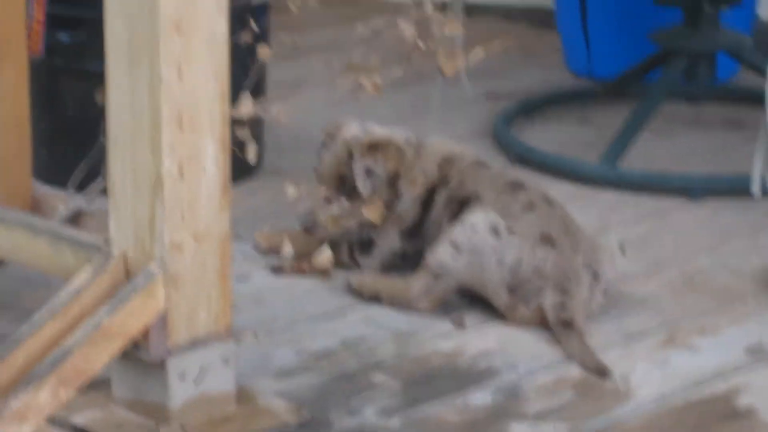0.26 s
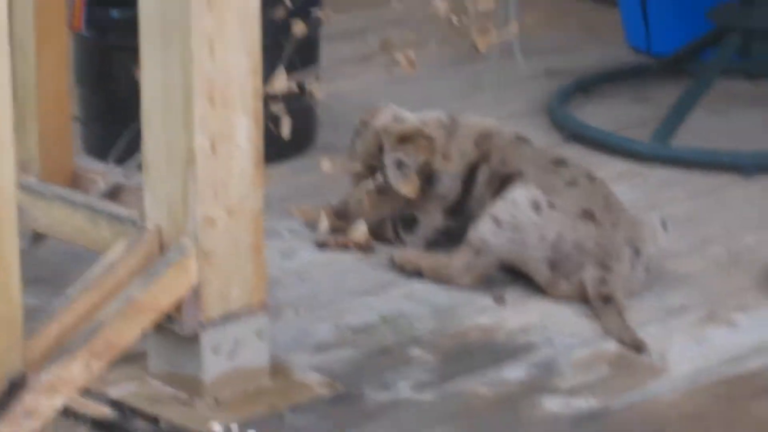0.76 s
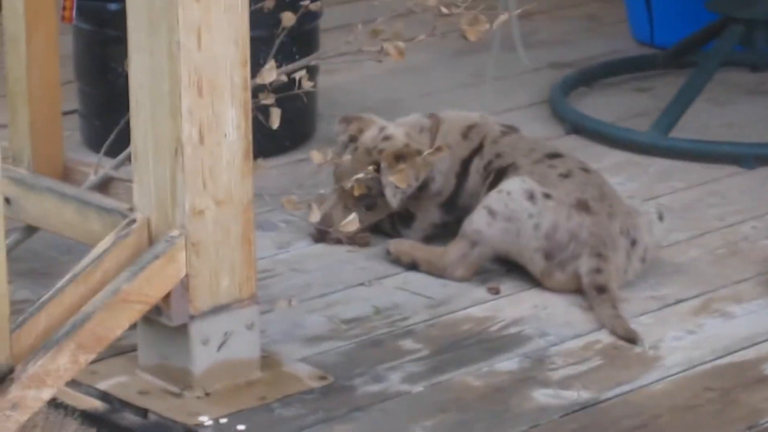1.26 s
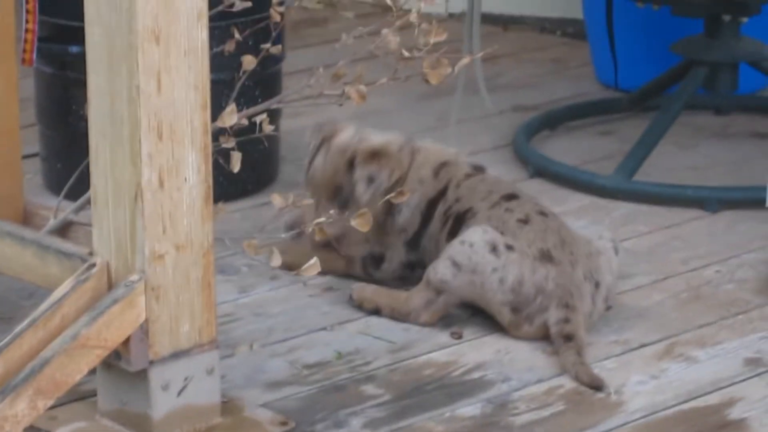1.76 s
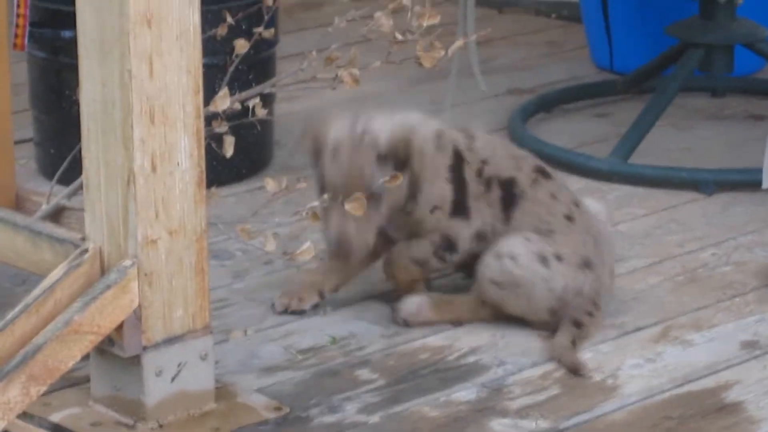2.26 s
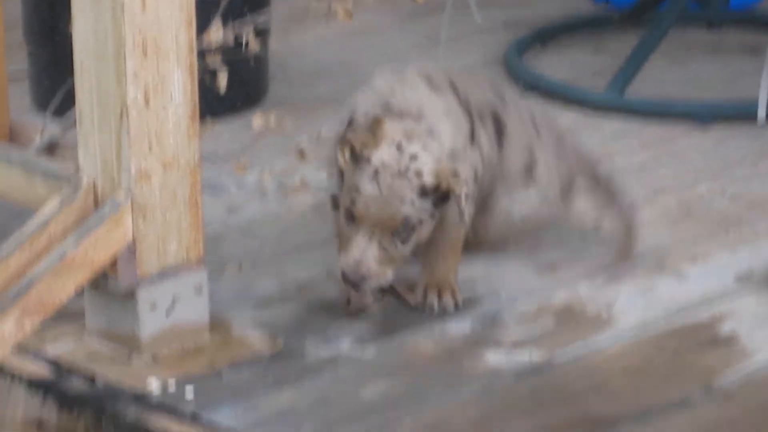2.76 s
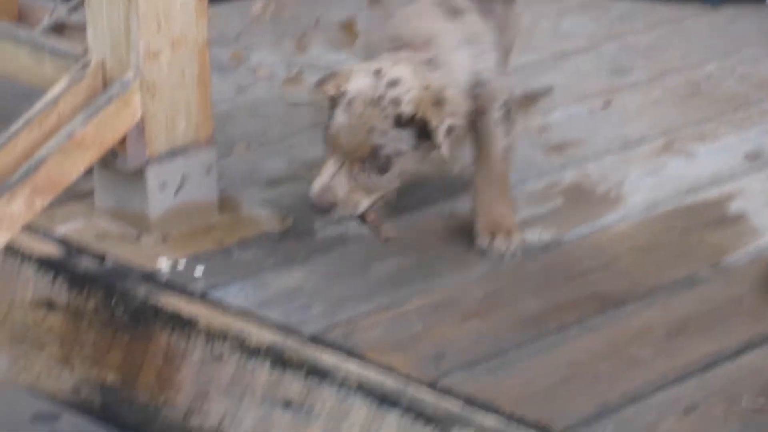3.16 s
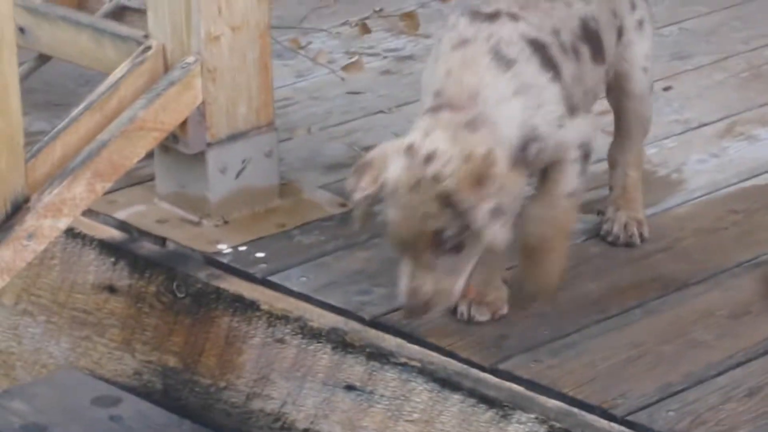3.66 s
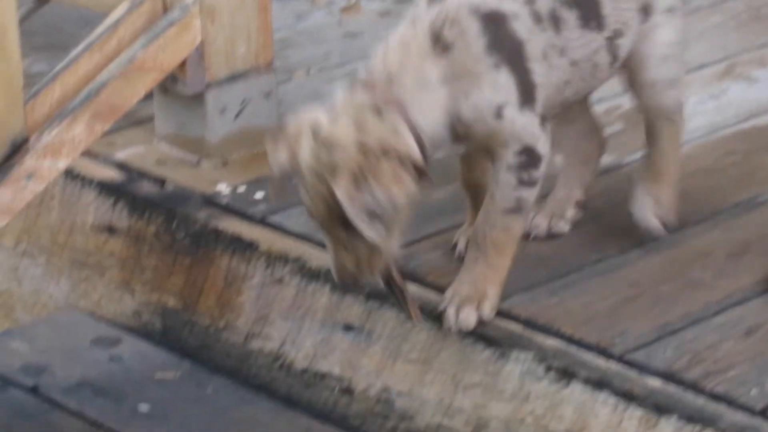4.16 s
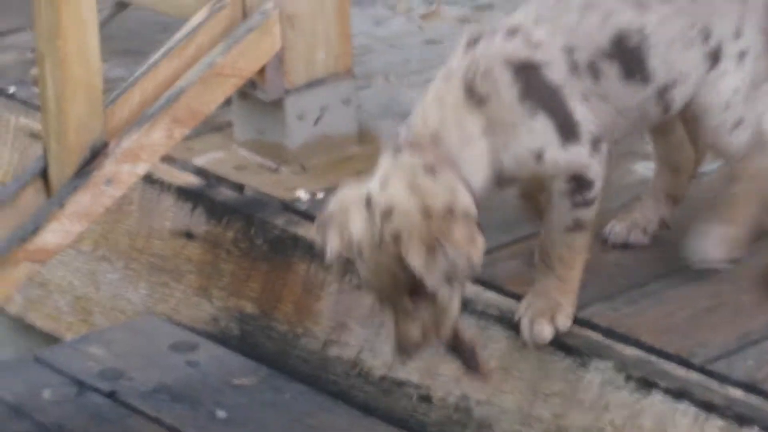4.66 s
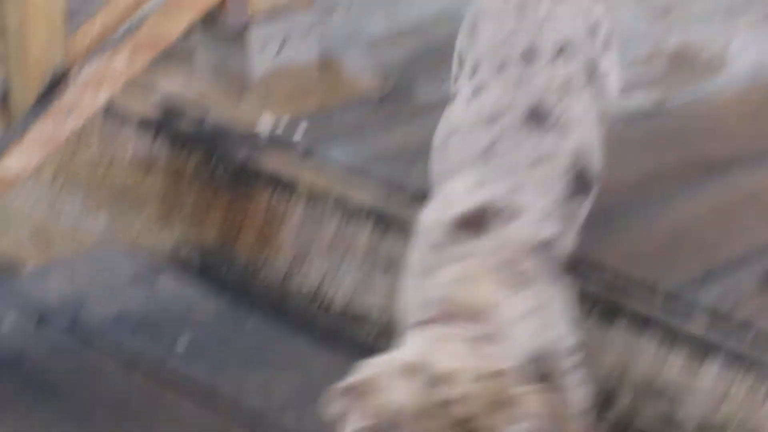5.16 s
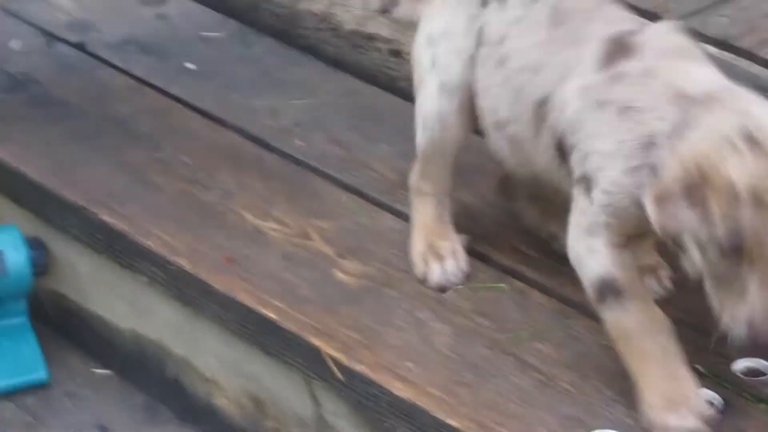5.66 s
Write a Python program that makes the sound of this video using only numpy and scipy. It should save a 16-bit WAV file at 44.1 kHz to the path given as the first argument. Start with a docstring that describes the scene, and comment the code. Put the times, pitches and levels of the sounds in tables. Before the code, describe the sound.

High bird chirps and twitters outdoors, a sharp click on the camera body, and a puppy's light paw thuds on a wooden deck.

```python
"""A wooden deck beside a house, heard from a hand-held camera. Small birds chip, buzz, twitter and scold
close by, their gliding whistles echoed by the boards, railings and walls. A puppy pads and scuffs about,
thudding on the boards and rubbing over the grain. Right at the microphone the camera's plastic shell
clicks once loudly and a few times softly. Far traffic and an airy hiss lie under it all."""
import sys
import numpy as np
from scipy import signal
from scipy.fft import rfft, irfft, next_fast_len
from scipy.io import wavfile
from scipy.ndimage import map_coordinates

SR = 44100
rng = np.random.default_rng(int(sys.argv[2]) if len(sys.argv) > 2 else 0)


def log_audio(samples):
    """Write samples as a 16-bit WAV file to the path given in sys.argv[1]."""
    # one column per channel
    frames = np.atleast_2d(samples).T
    # limit to full scale, then quantise
    limited = np.clip(frames, -1, 1)
    pcm = np.round(limited * 32767).astype(np.int16)
    wavfile.write(sys.argv[1], SR, pcm)


N = 260190
T = np.arange(N) / SR

# Sharp chips from perches around the deck; hidden birds reach the microphone mostly as echo.
# Each row: start in seconds, level in dB, starting pitch in Hz, echo against the direct call in dB.
BIRD_CHIPS = [(.582, -42, 8500, 7), (0.688, -47, 8600, 5), (1.149, -34.5, 8670, -3),
              (1.4125, -39.5, 8360, -3), (1.581, -43.5, 8560, 5), (1.6885, -41, 8250, 13),
              (1.8225, -34.5, 9240, 6), (2.009, -25.5, 9300, -8.5), (2.093, -37.5, 6330, -7),
              (2.148, -35, 7850, 5), (2.182, -32.5, 5780, -3), (2.355, -29.5, 8720, 7),
              (2.8672, -25, 9380, 1.5), (2.9868, -27, 9050, -3.5), (3.125, -30, 8730, 3.5),
              (3.2387, -31.5, 8570, 4), (3.2768, -40.5, 8000, 6), (3.6604, -31.5, 8500, 5),
              (3.6962, -29.5, 8650, -1), (3.809, -26.5, 8530, 5), (3.922, -39.5, 8800, 5),
              (4.212, -36, 8650, 4), (4.226, -35, 8760, 16), (4.346, -32, 8280, 1), (4.411, -47, 5160, 3),
              (4.644, -41, 8570, 4), (4.8278, -33.5, 8250, 1), (5.2271, -28.5, 8180, -3.5),
              (5.4303, -35.5, 8250, 5), (5.4519, -36, 8450, 0), (5.5673, -32, 8200, 0.5),
              (5.712, -36, 8400, -1), (5.8488, -38, 8650, 4)]

def chips():
    """Contact chips, each with the echo of its own perch."""
    out = np.zeros(N)
    for start, db, top_hz, echo_db in BIRD_CHIPS:
        add(out, start, amp(db) * yard(chip(top_hz), echo_db, wall_db=-15))
    return out

def chip(top_hz, usual_hz=8160, landing_hz=2101, rasp_db=4.0):
    """A raspy whistle that plunges about two octaves in milliseconds and fades as it levels out."""
    # Starting away from the usual pitch, it falls for longer and loses low end.
    octaves_off = abs(np.log2(top_hz / usual_hz))
    fall_s = 0.0047 + 0.0125 * octaves_off
    low_end_db = max(-1.4 - 41 * octaves_off, -11)
    end_hz = landing_hz * np.exp(0.069 * rng.standard_normal())
    age = ticks(3 * fall_s) / fall_s
    height = np.exp(-age ** 1.69)
    pitch = end_hz + (top_hz - end_hz) * height
    level_db = np.interp(age, [0, 0.22, 0.8, 1.4, 2.2, 3], [-14.5, 0.5, 0.5, -5, -8, -10.5])
    level_db += low_end_db * (1 - height)
    level_db += rasp_db * wobble(1137, len(age))
    return amp(level_db) * voice(pitch, [-1.5, -6.5, -16, -17], rough=0.028)

def buzz(start=1.96, length=0.135, flutter_hz=107.5):
    """One close whistle fluttering between two sagging pitches, the upper sinking to meet the lower."""
    low_hz, high_hz, sag_hz_per_s = 6640, 9440, 6100
    attack_s, swell_db, fade_db_per_s, release_s = 0.028, 12, 68, 0.0073
    out, t = np.zeros(N), ticks(length)
    span_hz = (high_hz - low_hz) * (1 - (t / length) ** 5)
    pitch = low_hz - sag_hz_per_s * t + span_hz * np.cos(np.pi * flutter_hz * t) ** 2
    level_db = -28.5 + np.minimum(swell_db * (t / attack_s - 1), -fade_db_per_s * (t - attack_s))
    release = np.minimum((length - t) / release_s, 1)
    call = amp(level_db) * release * voice(pitch, [0])
    add(out, start, yard(call, echo_db=-4, t60=0.18))
    return out

# Twitters near the deck. Each row: start in seconds, level of the first note in dB, number of notes.
BIRD_TWITTERS = [(3.766, -38.5, 3), (4.294, -36.5, 4)]

def twitter(note_s=0.0124, every_s=0.0135, growth_db=1.3):
    """Strings of arched notes, each louder and swooping up from lower down than the one before."""
    out, progress = np.zeros(N), ticks(note_s) / note_s
    for start, db, count in BIRD_TWITTERS:
        for k in range(round(count)):
            start_hz, crest_hz = 5900 * 0.76 ** k, 6600 - 100 * k
            pitch = crest_hz - (crest_hz - start_hz) * (1 - progress / 0.67) ** 2
            call = np.sin(np.pi * progress) ** 0.58 * voice(pitch, [1, -9])
            add(out, start + k * every_s, amp(db + growth_db * k) * yard(call, echo_db=-5))
    return out

# A quick run of high scolds, doubled by the house wall. Each row: start in seconds, starting pitch in Hz.
HIGH_SCOLDS = [(4.023, 3100), (4.105, 3245), (4.426, 3485), (4.503, 3480), (4.580, 3320), (4.661, 3310),
               (4.745, 3190), (4.835, 3130)]
# Hoarse nasal notes from farther off. Each row: start in seconds, level in dB, starting pitch in Hz.
NASAL_NOTES = [(.201, -51.5, 2224), (0.233, -50.5, 1975), (.301, -49.5, 2227), (.331, -51.5, 1950),
               (.514, -52.5, 2200), (.698, -52.5, 2050), (1.078, -52, 2126), (1.117, -52.5, 2190),
               (1.192, -58, 2110), (1.286, -54.5, 2055), (1.449, -46, 2130), (3.183, -51, 2065),
               (3.322, -55.5, 2080), (3.535, -53.5, 2183)]
# Thin gliding whistles, faint at the microphone. Each row: start in seconds, level in dB,
# length in seconds, starting pitch in Hz, fraction of the pitch lost by the end.
THIN_WHISTLES = [(0.756, -60, .09, 7250, 0.09), (3.645, -46.5, 0.054, 5450, 0.3)]

def scolding():
    """Drooping scolds, nasal notes and whistles, all through an open beak that favours 6 to 9 kHz."""
    out = np.zeros(N)
    for start, pitch_hz in HIGH_SCOLDS:
        call = note(pitch_hz, droop=0.52, length=0.02, overtones_db=[2, -0.5, 2, -2], rough=0.012)
        add(out, start, amp(-45.5) * yard(call, echo_db=-0.5, wall_db=-2.5, deck_db=-20))
    for start, db, pitch_hz in NASAL_NOTES:
        call = note(pitch_hz, droop=0.228, length=0.028, overtones_db=[0.5, 0, -2, -7.5], rough=0.04)
        add(out, start, amp(db) * yard(call, echo_db=-2.5, deck_db=-22, wall_db=-17, t60=0.18))
    for start, db, length, pitch_hz, droop in THIN_WHISTLES:
        call = note(pitch_hz, droop, length, overtones_db=[0, -7], rough=0.011)
        add(out, start, amp(db) * yard(call, echo_db=-4))
    return coloured(out, [(2000, 1.5), (4500, 0), (6500, 5), (8500, 2.5), (10500, -5.5)])

def note(pitch_hz, droop, length, overtones_db, rough):
    """A reedy note whose pitch sags faster and faster."""
    progress = ticks(length) / length
    pitch = pitch_hz * (1 - droop * (progress + 2 * progress ** 3) / 3)
    return np.sin(np.pi * progress) ** 0.75 * voice(pitch, overtones_db, rough)

def voice(pitch, overtones_db, rough=0.013):
    """A bird's tone on a slightly trembling pitch; overtones beyond hearing are dropped."""
    tremble = 1 + rough * wobble(893, len(pitch))
    phase = 2 * np.pi * np.cumsum(pitch * tremble) / SR
    return sum(amp(db) * np.sin(k * phase) * (k * pitch < SR / 2) for k, db in enumerate(overtones_db, 1))

def yard(call, echo_db, t60=0.21, deck_db=-1, wall_db=-6, wall_s=0.02):
    """A call with its bounces off deck and wall and the scatter from railings, new for each perch."""
    t = ticks(0.3)
    build_up = 1 - np.exp(-(t / 0.0022) ** 2)
    scatter = rng.standard_normal(len(t)) * amp(-60 * t / t60) * build_up
    path = scatter / np.linalg.norm(scatter)
    deck_delays = (rng.uniform(0.003, 0.012, size=5) * SR).astype(int)
    path[deck_delays] += amp(deck_db) / np.sqrt(5)
    path[int(wall_s * SR)] += amp(wall_db)
    path *= amp(echo_db)
    path[0] = 1  # the direct sound
    return signal.fftconvolve(call, path / np.linalg.norm(path))

# Contacts on the camera body, right at the microphone.
# Each row: start in seconds, peak level in dB, brightness in Hz.
SHELL_CLICKS = [(2.3788, -31, 1000), (2.3968, -18.5, 2200), (2.4086, -21, 1900), (2.4118, -0.5, 11900),
                (2.4188, -13, 2040), (5.879, -26.5, 4500)]
# Modes of the plastic shell. Each row: frequency in Hz, width in Hz, level in dB.
SHELL_MODES = [(300, 550, -31), (700, 72, -19), (1023, 62, -3), (1745, 107, 0.5), (2150, 193, -5),
               (2930, 260, -7.5), (4000, 100, -16.5), (4400, 220, -7.5), (4895, 380, -8.5),
               (6200, 330, -18.5), (7750, 780, -23), (9460, 600, -25.5)]

def camera():
    """Each contact rings the plastic shell with a short, dry click."""
    out = np.zeros(N)
    for start, db, bright_hz in SHELL_CLICKS:
        add(out, start, amp(db) * struck(SHELL_MODES, bright_hz))
    return out

# Modes of the deck boards. Each row: frequency in Hz, width in Hz, level in dB.
BOARD_MODES = [(112, 88, -4), (197, 70, -5), (337, 65, -3.5), (577, 140, -17)]
# Soft paw falls on the deck. Each row: start in seconds, peak level in dB.
PAW_FALLS = [(2.299, -50), (2.336, -51), (5.052, -41), (5.158, -43), (5.306, -37), (5.663, -53),
             (5.717, -39)]
# The puppy shifts its weight. Each row: start in seconds, length in seconds, level in dB, brightness in Hz.
WEIGHT_SHIFTS = [(2.26, 0.13, -50, 140), (2.53, 0.1, -58, 200), (5.03, .17, -56, 350),
                 (5.65, 0.077, -51, 350)]
# Claws tapping the wood. Each row: start in seconds, peak level in dB.
CLAW_TAPS = [(3.077, -48), (5.035, -44), (5.151, -38), (5.1704, -40)]
# The tone of one tap. Each row: frequency in Hz, level in dB.
CLAW_SPECTRUM = [(300, -32), (900, -17), (1800, 4), (4000, -3), (7000, -19), (11000, -31)]
# Paws and dry twigs dragged over the deck.
# Each row: start in seconds, length in seconds, level in dB, centre pitch in Hz.
DECK_SCUFFS = [(.07, 0.24, -48.5, 1000), (2.24, 0.18, -48.5, 610), (4.77, 0.11, -55, 1030),
               (4.948, 0.029, -47.5, 1100), (5.029, .036, -45.5, 800), (5.10, 0.2, -55.5, 1390),
               (5.51, 0.024, -50, 1400), (5.65, 0.026, -46, 1500), (5.684, 0.033, -49, 1810),
               (5.68, .13, -53, 550), (5.77, 0.073, -50, 1730), (5.825, 0.098, -50, 1470)]

def puppy(claw_t60=0.076, scuff_width_hz=680):
    """Pads thud on the boards, its weight makes them rumble, claws tick, and paws drag over the grain."""
    out, t = np.zeros(N), ticks(0.05)
    for start, db in PAW_FALLS:
        add(out, start, amp(db) * struck(BOARD_MODES, bright_hz=900))
    for start, length, db, bright_hz in WEIGHT_SHIFTS:
        add(out, start, amp(db) * rubbed(length, body(BOARD_MODES, bright_hz)))
    for start, db in CLAW_TAPS:
        tap = coloured(rng.standard_normal(len(t)), CLAW_SPECTRUM) * amp(-60 * t / claw_t60)
        add(out, start, amp(db) * tap / np.abs(tap).max())
    for start, length, db, pitch_hz in DECK_SCUFFS:
        grain = body([(pitch_hz, scuff_width_hz, 0)], bright_hz=9000)
        add(out, start, amp(db) * rubbed(length, grain))
    return out

def struck(modes, bright_hz):
    """A body's ring after one blow, peak 1."""
    ring = filtered(signal.unit_impulse(SR // 8), body(modes, bright_hz))
    return ring / np.abs(ring).max()

def rubbed(length, response, catches_per_s=2500):
    """A swelling and fading run of tiny catches through a resonance."""
    n = int(length * SR)
    catches = rng.standard_normal(n) * (rng.random(n) < catches_per_s / SR)
    return unit(filtered(catches, response)) * np.hanning(n)

def body(modes, bright_hz):
    """The response of modes of alternating sign; a soft contact leaves the high ones still."""
    def response(hz):
        ring = sum((-1) ** k * amp(db) * 1j * hz * width / (centre ** 2 - hz ** 2 + 1j * hz * width)
                   for k, (centre, width, db) in enumerate(modes))
        return ring / (1 + 1j * hz / bright_hz) ** 3
    return response

# One engine far from the house, easing off and picking up.
# Each row: time in seconds, pitch in Hz, level in dB.
FAR_ENGINE = [(1.8, 175, -79), (2.1, 181, -64), (2.56, 202, -59), (3.05, 175, -63.5), (3.8, 176, -61.5),
              (4.4, 176, -81), (4.85, 182, -60), (5.2, 199, -60), (5.6, 204, -71)]

def engine():
    """The faint wavering drone of a far vehicle."""
    pitch, level_db = curves(FAR_ENGINE)
    waver = 1 + 0.0118 * wobble(14, N)
    phase = 2 * np.pi * np.cumsum(pitch * waver) / SR
    return amp(level_db + 2.6 * wobble(9, N)) * np.sin(phase)

# Far traffic as it reaches the deck. Each row: time in seconds, level in dB.
TRAFFIC_LEVEL = [(0, -57.5), (1.02, -57), (2.07, -56.5), (2.25, -54), (2.9, -56), (3.8, -55), (4.6, -57.5),
                 (5.09, -52.5), (5.9, -55.3)]
# The tone of the traffic at that distance. Each row: frequency in Hz, level in dB.
TRAFFIC_SPECTRUM = [(12, -38), (20, -6), (48, -2.5), (70, -3), (97, 0.5), (162, -2.5), (241, 0),
                    (316, -1.5), (344, 0), (386, -4), (458, -8.5), (600, -12), (780, -25), (1320, -120)]

def traffic():
    """Distant traffic merges into a low, slowly swelling rumble."""
    level_db, = curves(TRAFFIC_LEVEL)
    return amp(level_db + 0.79 * wobble(5, N)) * unit(coloured(rng.standard_normal(N), TRAFFIC_SPECTRUM))

# The open air around the microphone. Each row: frequency in Hz, level in dB.
AIR_SPECTRUM = [(260, -15), (450, -2.5), (1150, -3), (1590, -7), (2690, -9), (3120, -9.5), (3380, -10.5),
                (4890, -12), (6550, -13), (7580, -13.5), (10700, -18.5), (13900, -48), (22000, -120)]

def air(level_db=-52):
    """A broad, almost even hiss."""
    return amp(level_db + 0.24 * wobble(2.97, N)) * unit(coloured(rng.standard_normal(N), AIR_SPECTRUM))

def amp(db):
    """Decibels to gain."""
    return 10 ** (np.asarray(db) / 20)

def unit(x):
    """Scale to rms 1."""
    return x / np.sqrt(np.mean(x ** 2) + 1e-20)

def ticks(seconds):
    """A time axis in seconds."""
    return np.arange(int(seconds * SR)) / SR

def curves(rows):
    """One value per sample for each column after the time."""
    times, *columns = np.transpose(rows)
    return [np.interp(T, times, column) for column in columns]

def wobble(rate, size):
    """A smooth random curve with rate knots a second."""
    knots = rng.standard_normal(int(size * rate / SR) + 4)
    return map_coordinates(knots, [np.arange(size) * rate / SR])

def filtered(x, response):
    """x through a complex response of frequency."""
    n = x.shape[-1]
    padded = next_fast_len(n + 8192)
    return irfft(rfft(x, padded) * response(np.fft.rfftfreq(padded, 1 / SR)), padded)[..., :n]

def coloured(x, points):
    """x through a smooth (Hz, dB) spectrum."""
    points_hz, db = np.transpose(points)
    return filtered(x, lambda hz: amp(np.interp(np.log(hz + 1), np.log(points_hz), db)))

def add(track, start, sound):
    """Mix a sound into the track at start seconds."""
    part = track[max(round(start * SR), 0):][:len(sound)]
    part += sound[:len(part)]

def scene():
    """Nearly mono; only the shell's clicks lean a little to the right."""
    outdoors = chips() + scolding() + buzz() + twitter() + puppy() + engine() + traffic() + air()
    return outdoors + camera() * amp([[-0.5], [0.5]])

def record(dry, ceiling=0.96, top_hz=10700):
    """The microphone dulls the very top; the camera rounds off the loudest peak and limits the band."""
    heard = coloured(dry, [(9300, 0.15), (10700, -3.4)])
    rounded = heard / (1 + np.abs(heard / ceiling) ** 12) ** (1 / 12)
    return filtered(rounded, lambda hz: hz < top_hz)

dry = scene()
out = record(dry)
log_audio(out)
```